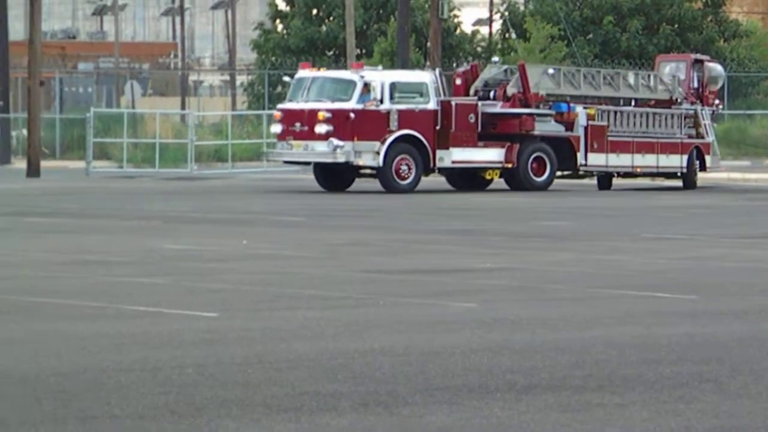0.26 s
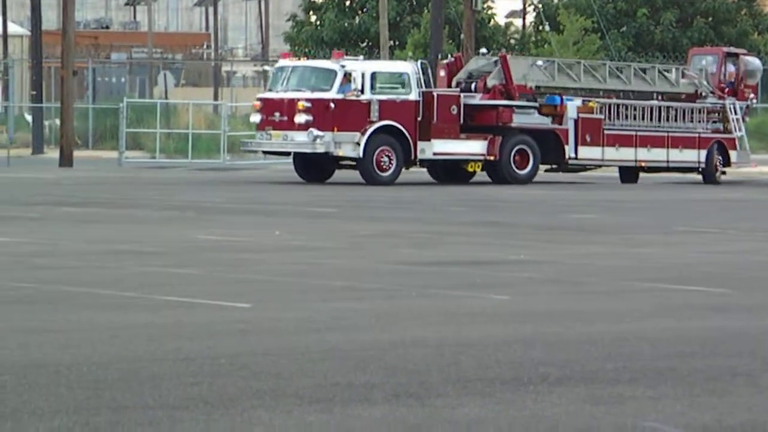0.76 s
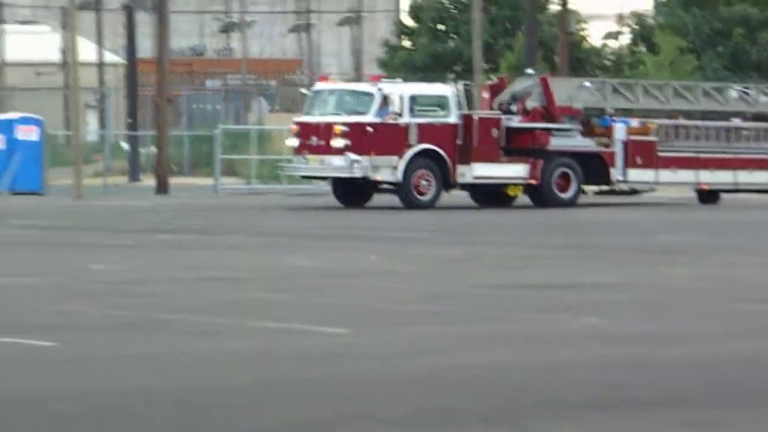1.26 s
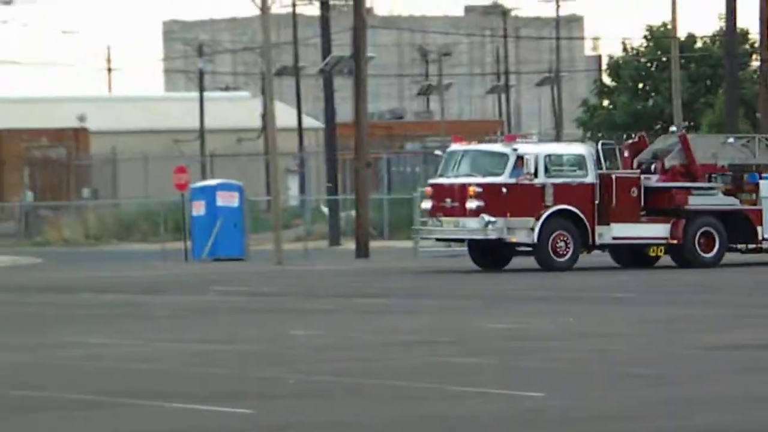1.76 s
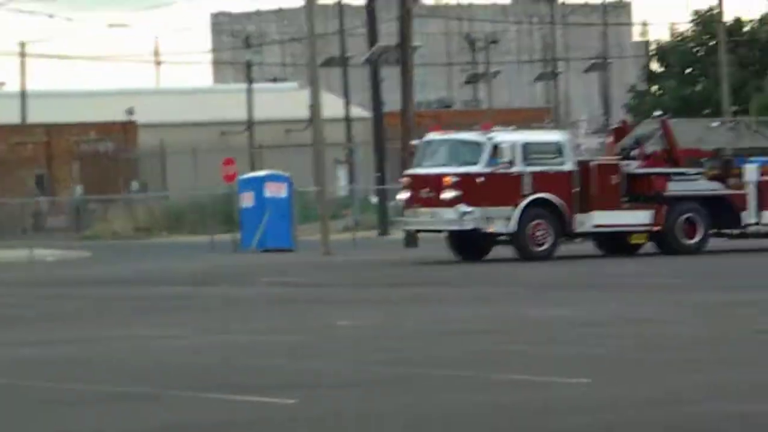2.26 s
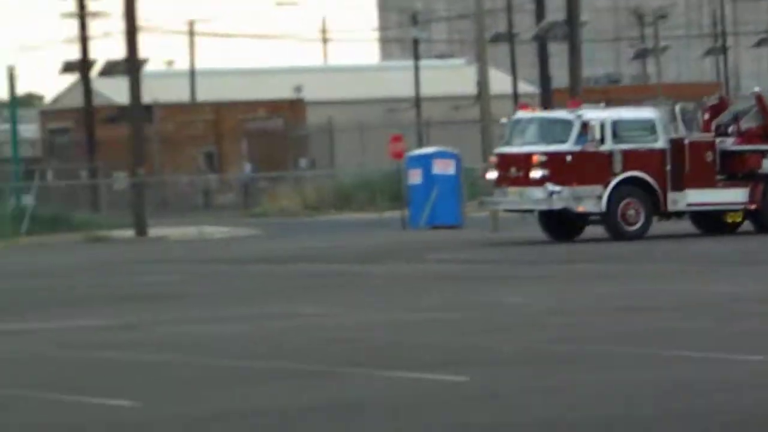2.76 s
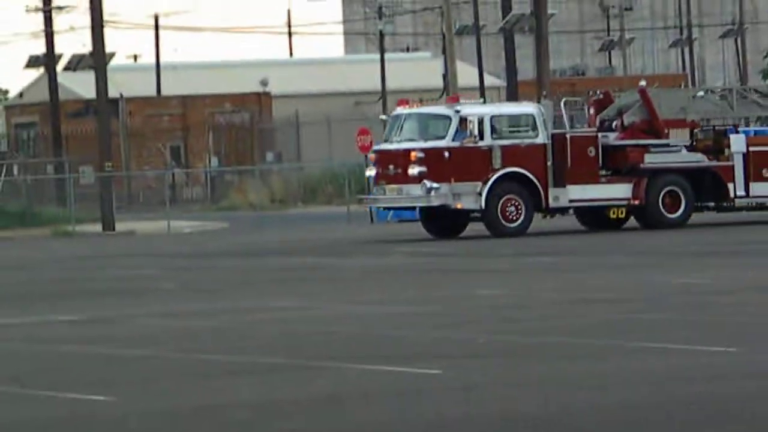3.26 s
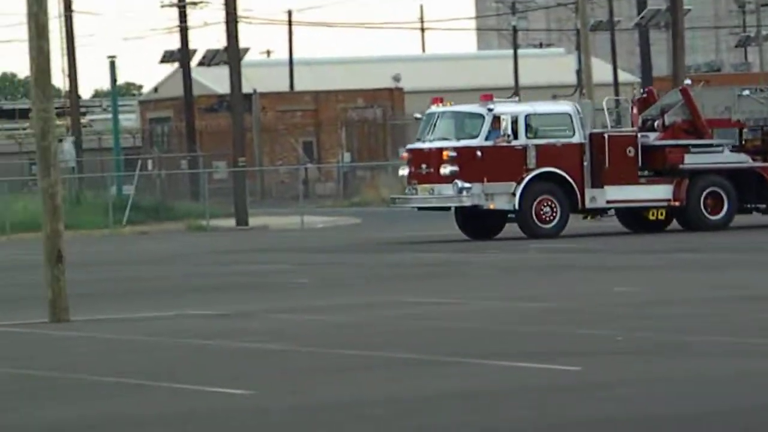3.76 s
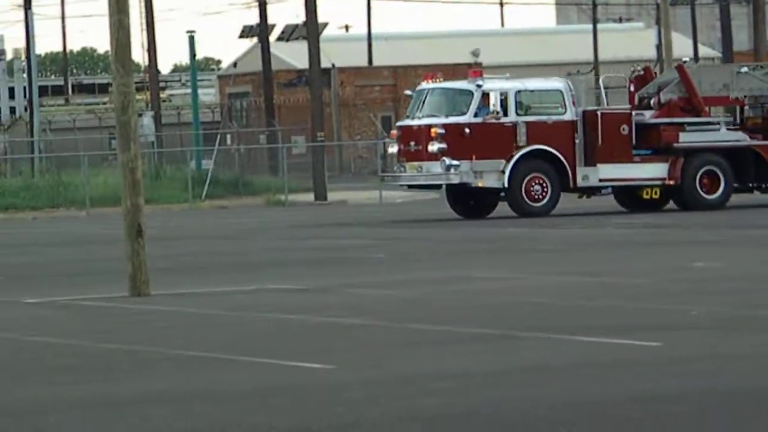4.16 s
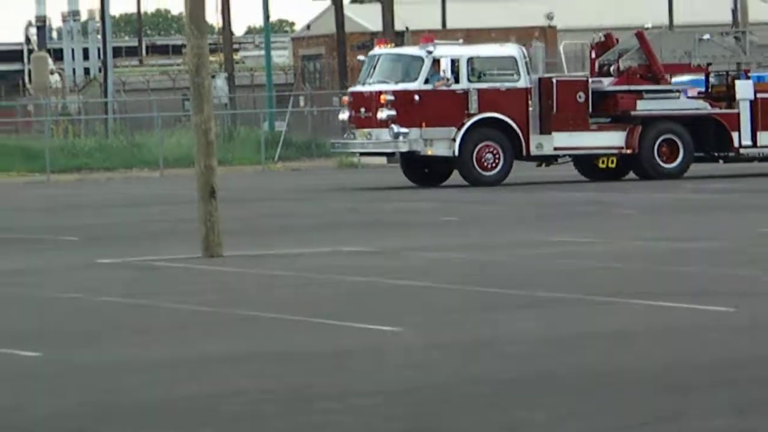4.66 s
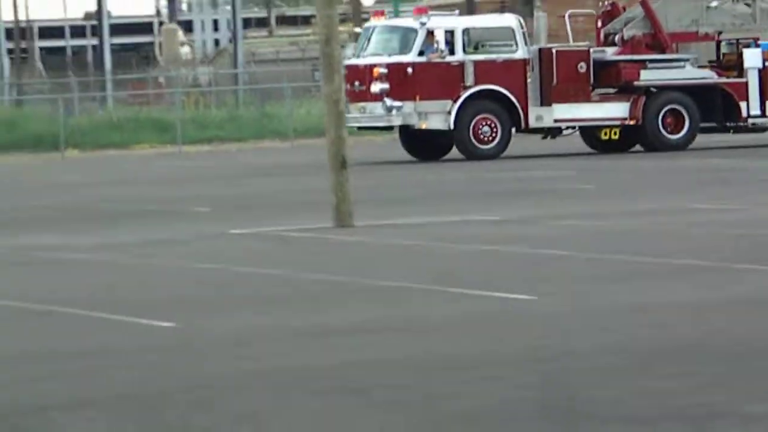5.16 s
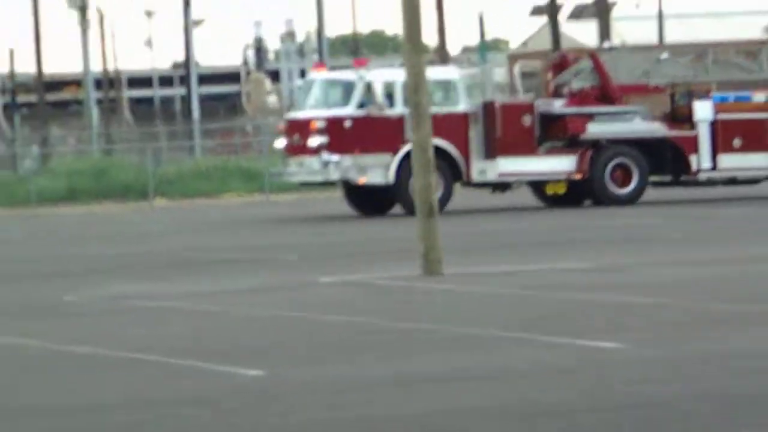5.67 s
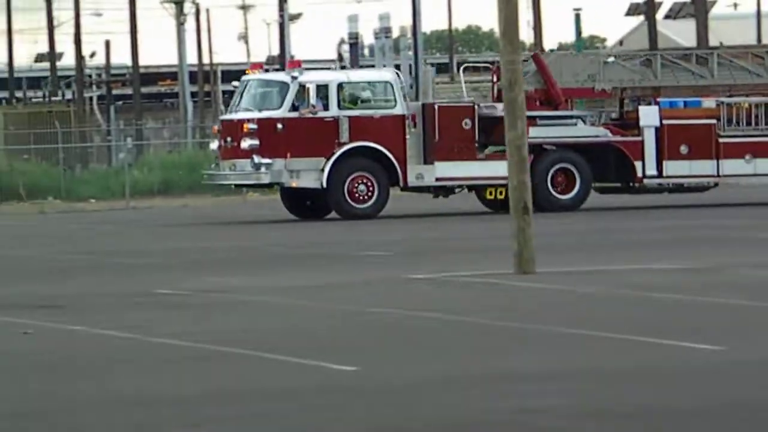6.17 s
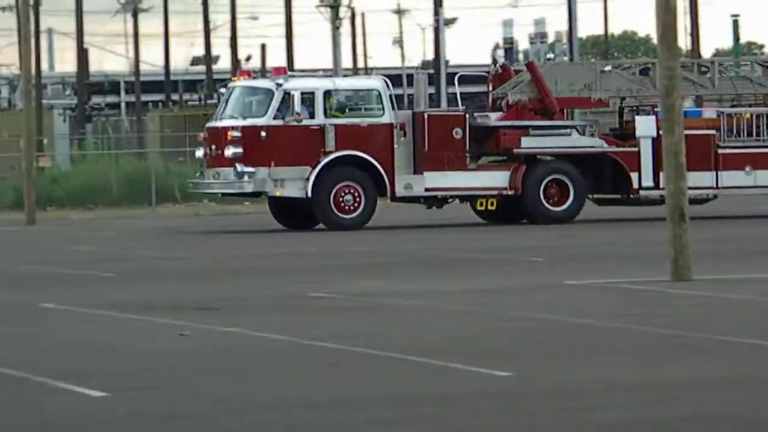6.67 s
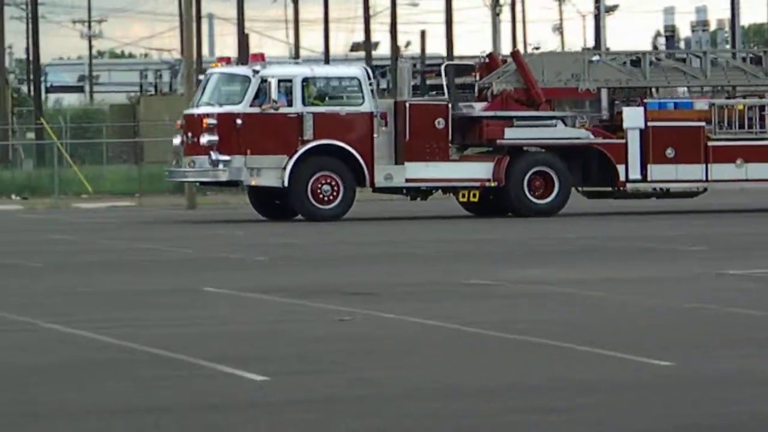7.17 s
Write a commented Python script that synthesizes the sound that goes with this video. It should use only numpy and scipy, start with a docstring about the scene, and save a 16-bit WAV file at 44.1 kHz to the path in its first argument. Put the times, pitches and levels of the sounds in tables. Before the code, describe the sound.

Outdoors on an open paved lot, wind rumbles and thumps against a handheld microphone, at first covering a distant two-stroke diesel. The fire truck's rough, droning engine grows louder and climbs steadily in pitch, with clattering block noise, airy hiss and a brief metallic rattle early on. A fan hum and thin gear whine join midway; revs peak late, then fall as the throttle closes.

```python
"""A truck with a two-stroke diesel pulls across an open paved lot, revving up, then easing off.
Its firing pattern, nearly the same each crank turn, and gas noise sound through exhaust, block and air hiss.
Wind rumbles, flaps and thumps at the microphone throughout; the tallest peaks are cut flat.
Ticks come near 0.1 s and 0.7 s, a dull tap at 0.5 s, a rattle of loose fittings at 2.2 s. The fan hum
rises by 3.8 s, gear whine swells from 4 s; revs peak at 6 s, then the throttle closes and they sag."""
import sys
import numpy as np
from scipy.fft import rfft, irfft, next_fast_len
from scipy.io import wavfile
from scipy.ndimage import map_coordinates

SR = 44100
rng = np.random.default_rng(int(sys.argv[2]) if len(sys.argv) > 2 else 0)


def put_to_file(sound):
    """Save the sound as 16-bit audio at rate SR, in the file named by the first command-line argument."""
    columns = np.atleast_2d(sound).T  # one column per channel
    safe = np.clip(columns, -1, 1)
    whole_steps = np.round(safe * 32767)
    wavfile.write(sys.argv[1], SR, whole_steps.astype(np.int16))


N = 326781

# Crank speed: t/s, f/Hz (turns per second)
CRANK_SPEED = [(0.0, 19.08), (1.11, 20.24), (1.65, 21.92), (2.02, 22.66), (2.29, 23.8), (2.91, 25.3),
               (3.3, 26.56), (4.5, 29.7), (4.83, 30.4), (5.2, 31.47), (5.6, 32.3), (6.05, 33.5),
               (6.4, 32.25), (6.81, 29.76), (7.2, 26.66), (7.41, 26.08)]
# Strength of multiples of crank speed in the firing: order, level/dB (relative)
FIRING_ORDERS = [(3, 1), (4, 17), (5, 2), (7, -7), (8, 5.5), (9, 5), (10, -4), (11, -3), (12, 2), (13, -11),
                 (14, -3.5), (15, 0.5), (16, -9.5), (17, -3.5), (18, -2), (19, -1), (20, 3), (21, -1),
                 (22, 2.5), (23, 1), (24, -2.5), (25, -4.5), (26, 3), (27, -2), (28, 0), (29, -1.5),
                 (30, 4), (31, -1), (32, 1), (33, 2), (34, 1), (35, 4), (36, 4), (37, -4), (38, 9),
                 (39, -8), (41, 3), (42, 5.5), (43, -1.5), (44, -2.5), (45, 7.5), (46, 4), (47, 3),
                 (48, -7.5), (49, 2), (50, -0.5), (51, 7), (53, 1.5), (54, 2), (55, 0), (57, -5), (58, 0),
                 (110, -8.5)]
UNEVEN_DB, UNEVEN_ABOVE_ORDER = 1.5, 58  # chance spread of the high orders
LIFT_S, LIFT_OVER_S, LIFT_DB = 6.25, .25, -5.5  # throttle closes, firing sinks into gas noise

# Engine levels as the truck turns its sides to the microphone:
# t/s, block level/dB, exhaust growl level/dB, exhaust boom level/dB
ENGINE_LEVELS = [(0.0, -40, -42, -35), (0.06, -41.5, -41, -25), (0.31, -40, -43, -24.5),
                 (1.09, -36.5, -40, -25.5), (1.67, -33, -31.5, -23), (1.86, -35.5, -32.5, -24),
                 (2.31, -28, -26.5, -20), (2.62, -31.5, -28, -23.5), (3.92, -29, -24.5, -18.5),
                 (4.46, -30, -28.5, -20.5), (4.6, -32.5, -26.5, -15.5), (4.62, -33.5, -32.5, -22),
                 (5.06, -30, -31.5, -20.5), (5.43, -29.5, -31.5, -24), (5.49, -26, -29, -25.5),
                 (5.7, -33, -29, -27.5), (6.33, -28.5, -26, -21.5), (6.4, -31.5, -31.5, -25),
                 (6.93, -27.5, -26, -17), (7.08, -27, -23.5, -22.5), (7.39, -33, -30, -26),
                 (7.41, -26, -20, -31)]
# Exhaust boom spectrum: f/Hz, level/dB (relative)
BOOM_SPECTRUM = [(70, -60.5), (95, -7.5), (112, -15), (175, -19), (225, -4.5), (270, 2.5), (330, -6),
                 (370, -10), (450, -46)]
# Exhaust growl spectrum: f/Hz, level/dB (relative)
GROWL_SPECTRUM = [(330, -35.5), (400, -5.5), (460, -6.5), (520, -0.5), (570, 2), (690, -0.5), (760, -5.5),
                  (850, -3.5), (950, -24), (1200, -56)]
# Engine block spectrum: f/Hz, level/dB (relative)
BLOCK_SPECTRUM = [(700, -56.5), (960, -3), (1070, 3.5), (1170, 0), (1300, 6.5), (1420, 3.5), (1560, 2),
                  (1720, -18.5), (2050, -41), (2400, -6), (2800, -12), (4000, -54.5)]

# Block knocks, four a turn, each fading in and out:
# t/s, first level/dB, second level/dB, third level/dB, fourth level/dB (relative)
KNOCK_LEVELS = [(0.099, -1, 8.5, -2.5, -13.5), (0.501, -11.5, 3.5, -1.5, -19.5), (0.9, -9, -9, -0.5, -5.5),
                (1.3, 1.0, -2, -5, -3), (1.699, -11.5, 1, -2, -13), (2.1, 1.5, -8.5, -1.5, -5.5),
                (2.5, 8, -6, -10, 4.5), (2.898, -8.5, 7, -10.5, -13.5), (3.3, -18, 1, -3.5, -13),
                (3.7, -9, -3.5, 0, -2.5), (4.1, 5, -10.5, 1.5, -4.5), (4.499, -5, 8, -11.5, 2),
                (4.899, 2, -1.5, -10, 3), (5.3, 5, -11, -17, 0.5), (5.699, 9, 7, -22.5, -11.5),
                (6.098, -0.5, 5.5, -11, -13), (6.5, 2, -2.5, -8.5, -0.5), (6.9, -1, 0, -12, -2),
                (7.3, -7, -1, 2.5, -8)]
# Block resonances: f/Hz, width/Hz, level/dB (relative)
KNOCK_RING = [(1300, 106, 3.5), (1440, 128, 0)]
KNOCK_AT_QUARTER = .42  # position within a quarter turn, 0-1
KNOCK_SCATTER_DB, KNOCK_JITTER_S = 1.8, .00005

# Air and tyres: t/s, level/dB, sizzle level/dB over the hiss
HISS_LEVELS = [(0.2, -43, -11), (0.28, -42.5, -11), (0.66, -43.5, -10), (0.72, -42, -6), (0.74, -40, -10),
               (0.98, -41.5, -9.5), (1.5, -38.5, -9.5), (1.69, -37.5, -12.5), (1.79, -37, -9.5),
               (2.07, -39.5, -11.5), (2.2, -32.5, -10.5), (2.25, -29, -7), (2.29, -31.5, -10),
               (2.37, -33, -10.5), (2.69, -37, -8.5), (2.99, -35, -10.5), (3.27, -33, -8.5),
               (3.49, -33, -10.5), (3.79, -30, -6), (3.87, -31, -8), (4.09, -31, -9), (4.21, -35.5, -11.5),
               (4.32, -31, -10), (4.62, -32.5, -14.5), (4.66, -33, -9), (4.98, -34, -11),
               (5.18, -32.5, -6.5), (5.26, -34, -12.5), (5.38, -31.5, -4), (5.5, -31, -5.5),
               (6.18, -33, -10), (6.27, -29.5, -5), (6.4, -35.5, -9.5), (6.63, -36, -8.5),
               (6.93, -31.5, -8.5), (7.03, -30.5, -7.5), (7.21, -36.5, -9.5), (7.41, -37, -9)]
# Hiss spectrum: f/Hz, level/dB (relative)
HISS_SPECTRUM = [(1000, -33), (1740, -4.5), (2070, 0), (2250, -5.5), (2860, -3), (3690, -3), (3880, -5.5),
                 (4550, -4.5), (4900, -1), (5250, -5), (5840, -8), (6500, -12), (8450, -35.5)]
# Sizzle spectrum: f/Hz, level/dB (relative)
SIZZLE_SPECTRUM = [(5000, -40.5), (6200, -5.5), (7200, 1.5), (8200, -10.5), (9500, -27)]

# Blower gear whine swells: t/s, level/dB
WHINE_SWELLS = [(1.45, -60), (4.04, -39.5), (4.33, -40), (4.5, -42), (4.8, -48), (4.97, -48), (5.13, -42.5),
                (5.42, -44), (5.9, -46), (6.35, -48), (6.62, -51), (6.77, -48), (6.96, -41.5)]
GEAR_ORDER = 97.85  # teeth meeting per crank turn
GEAR_STEADY_DB, SWELL_HALF_WIDTH_S = -60.5, .11
# Fan hum: t/s, level/dB
FAN_LEVELS = [(3.3, -54), (3.8, -27), (4.4, -30.5), (5.2, -31), (6.1, -28), (6.5, -31), (7.0, -50)]
FAN_ORDER = 7.4  # blades passing per crank turn

# Loose fittings over a bump: t/s, envelope peak level/dB, f/Hz
RATTLE_HITS = [(2.2105, -21, 2500), (2.221, -21, 2500), (2.2374, -25, 2600), (2.2452, -20.5, 3550),
               (2.2457, -14.5, 6600), (2.2528, -17, 4000), (2.256, -28, 7200), (2.2645, -22, 5000),
               (2.3244, -21, 7340)]

# Wind rumble: t/s, level/dB
RUMBLE_LEVELS = [(0.05, -9), (0.09, -12), (1.82, -16.5), (2.05, -15.5), (2.19, -20.5), (2.6, -11.5),
                 (3.38, -24.5), (3.44, -21), (3.52, -25.5), (4.07, -19), (4.17, -11.5), (4.32, -22),
                 (4.44, -27.5), (4.54, -10.5), (4.72, -9.5), (4.74, -16), (4.89, -11.5), (5.52, -17),
                 (5.58, -12), (6.11, -13), (6.22, -18), (6.32, -10.5), (6.75, -12), (6.91, -16.5),
                 (7.24, -10.5), (7.38, -11)]
# Wind rumble spectrum: f/Hz, level/dB (relative)
RUMBLE_SPECTRUM = [(8.8, -52), (15, -14.5), (70, -0.5), (102, -3), (167, -7), (231, -14), (260, -22.5),
                   (340, -55), (570, -120)]
# Fast buffeting: t/s, level/dB
FLAP_LEVELS = [(0, -25), (.25, -21.5), (.5, -24.5), (.7, -24), (1, -29), (1.5, -33), (1.85, -28),
               (2.2, -35), (2.7, -26.5), (3.1, -31.5), (3.5, -41), (4.07, -38.5), (4.17, -30), (4.28, -47),
               (4.46, -32.5), (4.58, -14.5), (4.68, -25.5), (4.8, -19.5), (5, -19.5), (5.25, -23.5),
               (5.4, -27), (5.7, -20), (6, -21), (6.2, -26.5), (6.45, -19.5), (6.7, -23), (6.9, -28.5),
               (7.15, -18), (7.41, -21.5)]
# Fast buffeting spectrum: f/Hz, level/dB (relative)
FLAP_SPECTRUM = [(100, -29), (200, 5), (320, 2.5), (450, -4.5), (750, -10.5), (950, -18), (1300, -26),
                 (3000, -63.5)]
# Single pushes of wind on the diaphragm: t/s, envelope peak level/dB, f/Hz
WIND_THUMPS = [(0.037, -12.5, 270), (0.119, -10, 400), (0.185, -9, 375), (0.24, -14.5, 330),
               (0.293, -11, 273), (0.385, -13, 270), (0.479, -6, 328), (0.634, -10, 380), (0.839, -6, 300),
               (0.977, -9.5, 270), (1.405, -8, 270), (1.809, -9, 266), (1.863, -10, 268), (2.795, -13, 270),
               (4.163, 2, 257), (4.522, -11, 270), (4.593, -1.5, 277), (4.911, -7.5, 276),
               (5.078, -0.5, 350), (5.175, 2, 268), (5.295, -5, 266), (5.727, -3, 350), (5.815, -6, 269),
               (5.91, -1, 403), (5.975, -6, 267), (6.044, -2, 268), (6.394, -8, 270), (6.436, 1, 270),
               (6.468, -3.5, 273), (6.525, -4, 270), (6.584, -7, 380), (6.657, -15, 267), (6.793, -19, 265),
               (7.137, -8.5, 270), (7.205, -10, 270), (7.274, -2.5, 400)]

# Ticks close to the microphone: t/s, level/dB
TICK_HITS = [(0.0977, -22), (0.1014, -26), (0.1301, -26), (0.1434, -29), (0.7078, -11), (0.7214, -28),
             (0.7292, -24)]
# Tick resonances: f/Hz, level/dB (relative), t60/s
TICK_RING = [(6800, -2.5, 0.0061), (4400, -12, 0.0034), (2900, -20, .002)]
# Dull tap on the housing: t/s, envelope peak level/dB, f/Hz
HOUSING_TAP = [(.4805, -19, 1500)]

CLIP_LEVEL = .71  # full scale = 1
TOP_HZ, TOP_FADE_HZ = 8990, 700


def amp(db):
    """Decibels to gain."""
    return 10 ** (np.asarray(db) / 20)


def unit(x):
    """Scale to rms 1."""
    return x / np.sqrt(np.mean(x ** 2) + 1e-20)


def curves(rows):
    """Interpolate each column after the time to one value per sample."""
    s, *cols = np.transpose(rows)
    return [np.interp(np.arange(N) / SR, s, c) for c in cols]


def wobble(knots_per_s):
    """Smooth random curve through normally distributed knots."""
    return map_coordinates(rng.standard_normal(N // 100), [np.arange(N) * knots_per_s / SR])


def filtered(x, response):
    """Multiply the spectrum of x by a response of frequency."""
    m = next_fast_len(N + SR // 2)
    return irfft(rfft(x, m) * response(np.fft.rfftfreq(m, 1 / SR)), m)[:N]


def coloured(x, spectrum):
    """Shape x by spectrum points on a log-frequency axis, rms 1."""
    f, db = np.transpose(spectrum)

    def response(hz):
        return amp(np.interp(np.log(hz + 1), np.log(f), db, -120, -120))

    return unit(filtered(x, response))


def blows(events, cycles, noise):
    """Damped swing with some grit per event; its envelope peaks after the given cycles."""
    out, t = np.zeros(N + SR), np.arange(SR // 20) / SR
    for s, db, hz in events:
        swing = np.sin(2 * np.pi * hz * t) + noise * rng.standard_normal(len(t))
        envelope = hz * t * np.exp(-hz * t / cycles) / cycles * np.e
        out[round(s * SR):][:len(t)] += amp(db) * swing * envelope
    return out[:N]


def truck():
    """Firing and gas noise shaped by exhaust, block and air paths, plus gears, fan and sizzle."""
    turns = crank_turns()
    block_db, growl_db, boom_db = curves(ENGINE_LEVELS)
    hiss_db, sizzle_db = curves(HISS_LEVELS)
    lift = np.clip((np.arange(N) / SR - LIFT_S) / LIFT_OVER_S, 0, 1)
    beat = amp(LIFT_DB * lift) * firing(turns, drift_db=3.3, slip_rad=.35, turns_per_change=6)

    # gas-noise gains before shaping; white noise spreads far wider than the orders
    boom = coloured(beat + amp(-4) * puffs(turns, depth=.4), BOOM_SPECTRUM)
    growl = coloured(beat + amp(.4) * puffs(turns, depth=.4), GROWL_SPECTRUM)
    clatter = coloured(beat + amp(7) * puffs(turns, depth=.5), BLOCK_SPECTRUM)
    block = unit(clatter + amp(-4) * knocks(turns))
    hiss = coloured(beat + amp(15) * puffs(turns, depth=.15), HISS_SPECTRUM)
    sizzle = coloured(rng.standard_normal(N), SIZZLE_SPECTRUM) * amp(sizzle_db + 0.7 * wobble(21))

    engine = amp(boom_db) * boom + amp(growl_db) * growl + amp(block_db) * block
    air = amp(hiss_db + .6 * wobble(9)) * (hiss + sizzle)
    return engine + gears(turns) + fan(turns) + air


def crank_turns():
    """Integrate crank speed to turns so far."""
    return np.cumsum(curves(CRANK_SPEED)[0]) / SR


def firing(turns, drift_db, slip_rad, turns_per_change, count=110, size=4096):
    """Pressure pattern of one turn, repeated; high orders drift most in strength and phase as the truck moves."""
    order, db = np.transpose(FIRING_ORDERS)
    orders = np.arange(1, count + 1)
    chance = rng.standard_normal((2, 150, count)) * np.sqrt(np.minimum(orders / 28, 1))
    phase = rng.uniform(0, 2 * np.pi, count) + np.cumsum(slip_rad * chance[0], axis=0)
    uneven_db = UNEVEN_DB * rng.standard_normal(count) * (orders > UNEVEN_ABOVE_ORDER)
    level = amp(np.interp(orders, order, db) + uneven_db + drift_db * chance[1])

    # one row per drift state, one column per crank angle; read between both
    harmonics = np.pad(level * np.exp(1j * phase), ((0, 0), (1, 0)))
    pattern = np.pad(irfft(harmonics, size), ((0, 0), (0, 1)), "wrap")
    return unit(map_coordinates(pattern, [turns / turns_per_change, turns % 1 * size], order=1))


def puffs(turns, depth):
    """Gas noise swelling with each of eight firings a turn, rms 1."""
    return unit(rng.standard_normal(N) * (1 + depth * np.cos(2 * np.pi * 8 * turns)))


def knocks(turns):
    """Impulses, four a turn with their own strengths, ring the block resonances."""
    s, *levels = np.transpose(KNOCK_LEVELS)
    count = np.arange(int(4 * turns[-1]) - 1)
    chance = rng.standard_normal((len(count), 2))
    at = np.interp((count + KNOCK_AT_QUARTER) / 4, turns, np.arange(N) / SR)
    db = np.array([np.interp(at, s, level) for level in levels])[count % 4, count]
    where = np.round((at + KNOCK_JITTER_S * chance[:, 0]) * SR).astype(int)
    impulses = np.bincount(where, amp(db + KNOCK_SCATTER_DB * chance[:, 1]), N)

    def ring(f):
        total = 0
        for k, (centre, width, gain_db) in enumerate(KNOCK_RING):
            resonance = 1j * f * width / (centre * centre - f * f + 1j * f * width)
            total = total + (-1) ** k * amp(gain_db) * resonance  # alternating polarity
        return total

    return unit(filtered(impulses, ring))


def gears(turns):
    """Blower tooth-meshing sine locked to the crank, wavering, with swells over a steady level."""
    t = np.arange(N) / SR
    swells = sum(amp(db) * np.exp(-((t - s) / SWELL_HALF_WIDTH_S) ** 2) for s, db in WHINE_SWELLS)
    level = amp(GEAR_STEADY_DB) + swells
    waver = amp(2.5 * wobble(18))
    whine = np.sin(2 * np.pi * GEAR_ORDER * turns + .3 * wobble(25))
    return np.sqrt(2) * level * waver * whine


def fan(turns):
    """Blade-passing sine between two crank orders, with wandering level and phase."""
    level = amp(curves(FAN_LEVELS)[0] + 1.1 * wobble(5.3))
    return np.sqrt(2) * level * np.sin(2 * np.pi * FAN_ORDER * turns + 0.54 * wobble(3.8))


def rattle():
    """Loose fittings strike over a bump: gritty damped swings."""
    return blows(RATTLE_HITS, cycles=1.66, noise=0.37)


def wind():
    """Eddies push the diaphragm: lumpy low noise, faster flaps sharing its lumps, single thumps."""
    eddies = wobble(16)
    rumble = coloured(rng.standard_normal(N) * amp(1.9 * eddies), RUMBLE_SPECTRUM)
    flaps = coloured(rng.standard_normal(N) * amp(1.5 * eddies + 3.6 * wobble(110)), FLAP_SPECTRUM)
    thumps = blows(WIND_THUMPS, cycles=0.26, noise=0.039)
    return amp(curves(RUMBLE_LEVELS)[0]) * rumble + amp(curves(FLAP_LEVELS)[0]) * flaps + thumps


def ticks():
    """Small hard ticks: decaying resonances plus a noise burst."""
    out, t = np.zeros(N + SR), np.arange(SR // 20) / SR
    for s, db in TICK_HITS:
        ring = sum(amp(level - 60 * t / t60) * np.sin(2 * np.pi * hz * t) for hz, level, t60 in TICK_RING)
        burst = 0.34 * amp(-60 * t / 0.022) * rng.standard_normal(len(t))
        out[round(s * SR):][:len(t)] += amp(db) * (ring + burst)
    return out[:N]


def housing_tap():
    """Dull tap on the housing: one gritty, quickly damped swing."""
    return blows(HOUSING_TAP, cycles=.4, noise=.3)


def scene():
    """Sum truck, rattle, wind, ticks and tap at one microphone."""
    return (truck() + rattle() + wind() + ticks() + housing_tap())[None]


def record(dry):
    """Input stage cuts the tallest peaks flat, then the band limit fades the top to nothing."""
    clipped = np.clip(dry[0], -CLIP_LEVEL, CLIP_LEVEL)
    return filtered(clipped, lambda hz: np.clip((TOP_HZ - hz) / TOP_FADE_HZ, 0, 1) ** 0.86)[None]


dry = scene()
out = record(dry)
put_to_file(out)
```